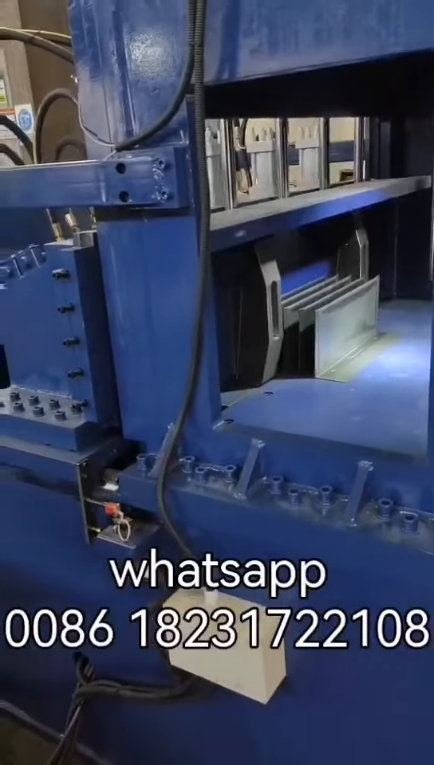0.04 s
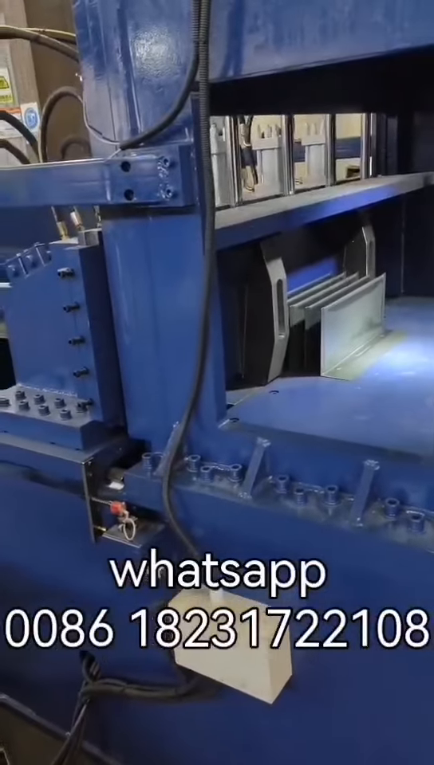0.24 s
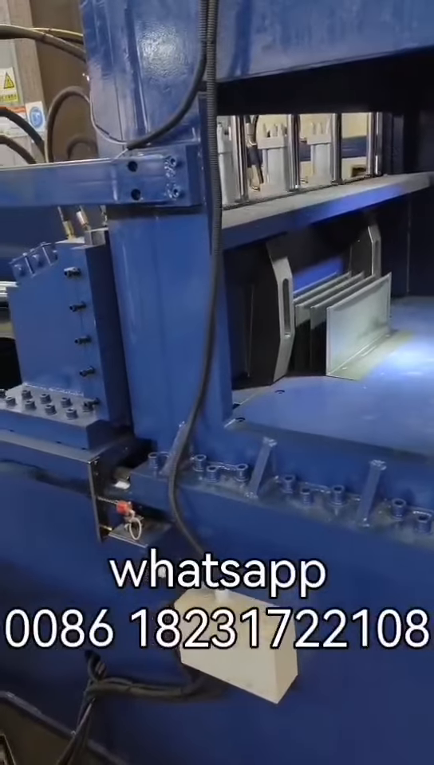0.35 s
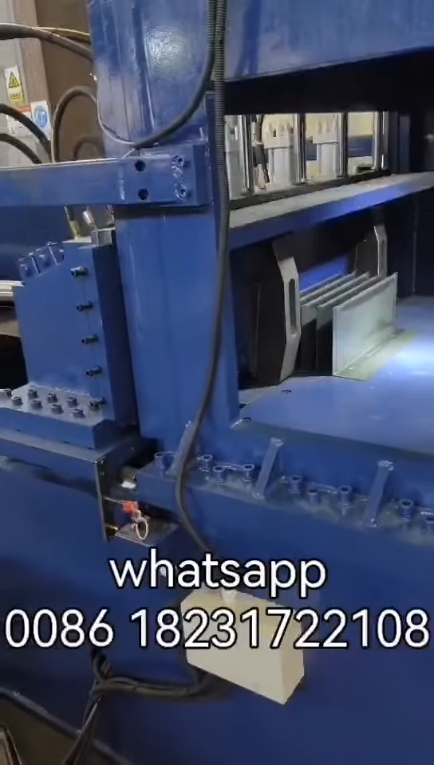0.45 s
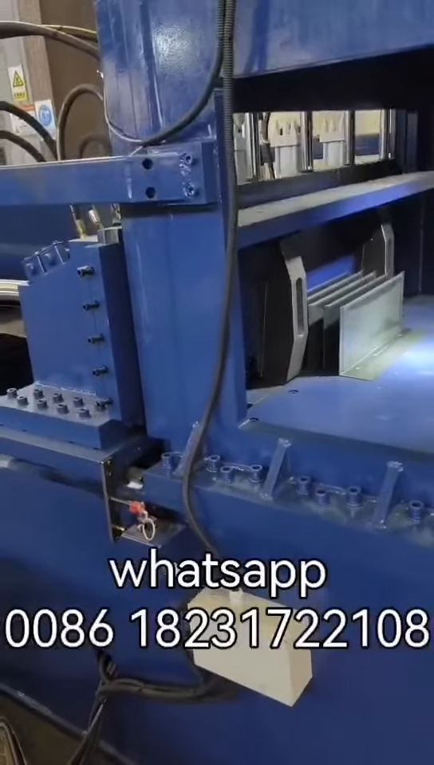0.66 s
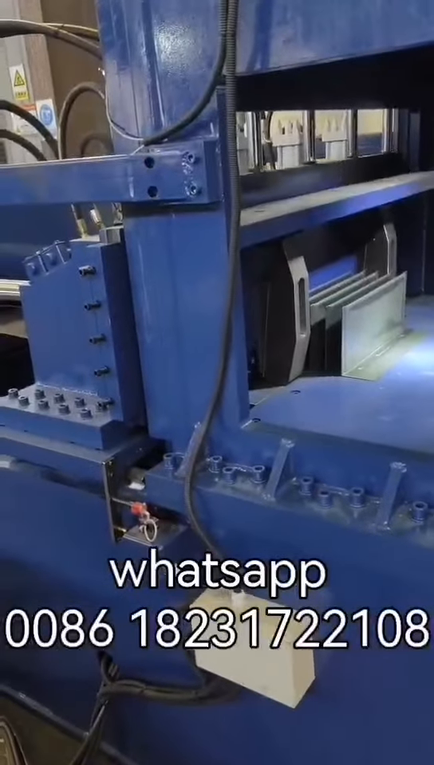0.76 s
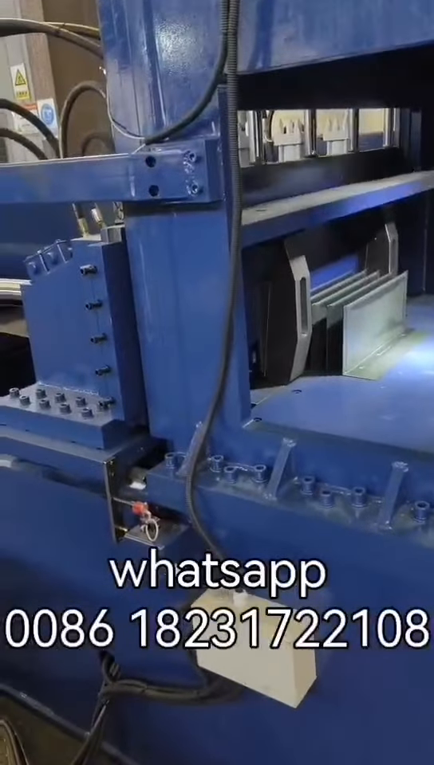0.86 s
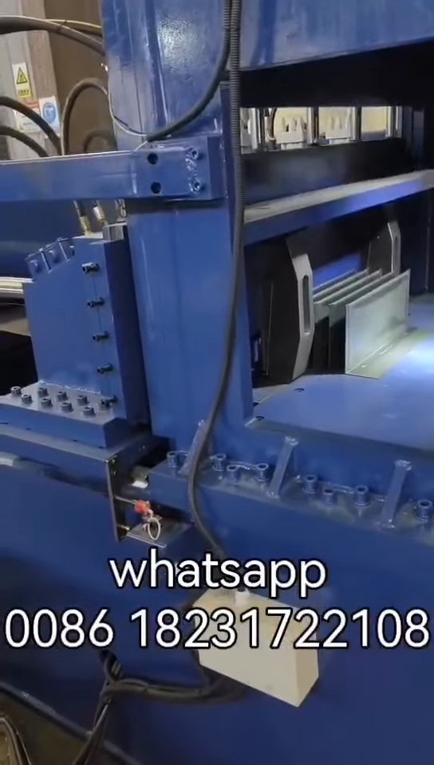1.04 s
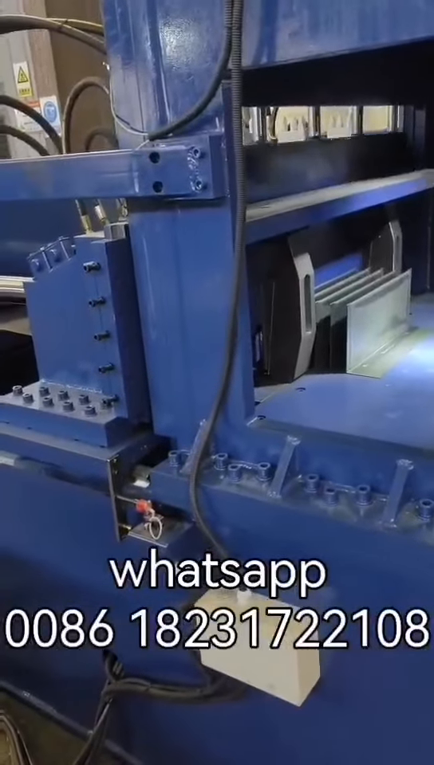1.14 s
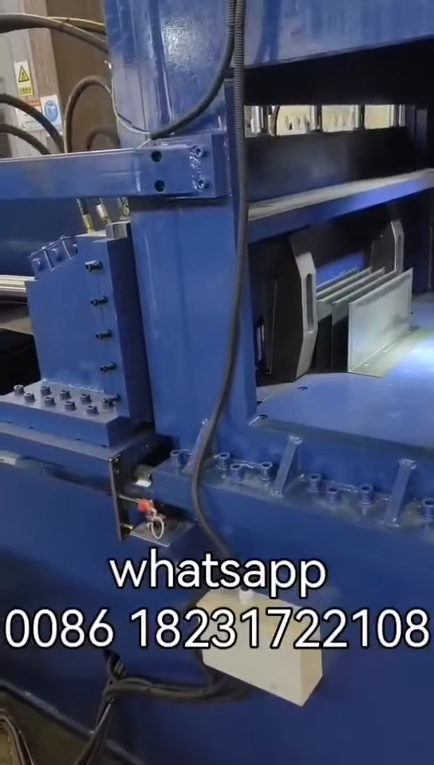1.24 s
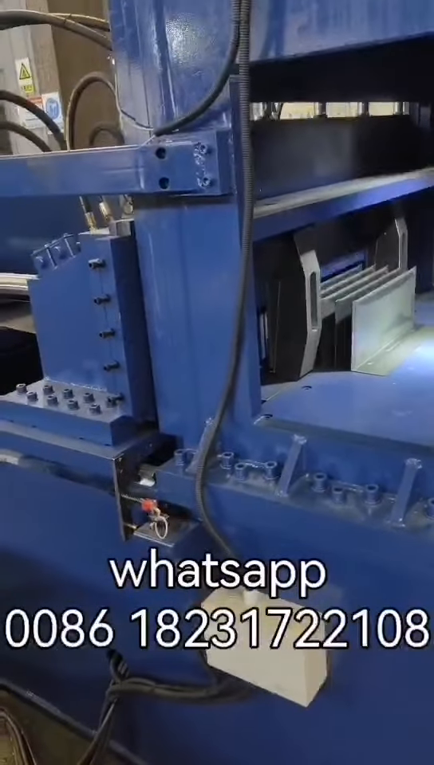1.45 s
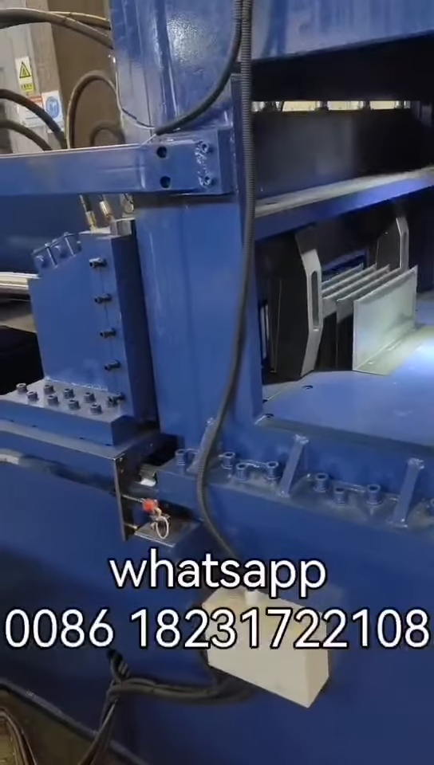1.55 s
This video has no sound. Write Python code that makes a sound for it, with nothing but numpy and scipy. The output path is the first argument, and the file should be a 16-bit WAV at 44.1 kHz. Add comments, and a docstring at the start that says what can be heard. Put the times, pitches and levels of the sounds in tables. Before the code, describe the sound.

A hydraulic metal forming machine surges with low knocks, then runs with a steady hiss and hum.

```python
"""A hydraulic metal forming machine starts its stroke, heard at one microphone in a factory hall.
At first the pump idles in the background. At 0.2 s a valve ticks open, the surge of oil knocks the
pipes and the steel frame in the foreground, and the hall booms. Oil spits and hisses through the
valve and the ram begins to hum. From 0.7 s the knocks die away, and the hiss, a thin whistle and
the hum of the moving ram carry on to the end."""
import sys
import numpy as np
from scipy import signal
from scipy.fft import rfft, irfft
from scipy.io import wavfile

SR = 44100
rng = np.random.default_rng(int(sys.argv[2]) if len(sys.argv) > 2 else 0)


def transcribe(u):
    """Save the signal u as a 16-bit wav file named by the first command-line argument.

    u: samples, shape (n,) or (channels, n), limited to [-1, 1]; the rate is SR.
    q: integer samples, one column per channel.
    """
    v = np.clip(np.atleast_2d(u).T, -1, 1)
    q = np.round(v * 32767).astype(np.int16)
    wavfile.write(sys.argv[1], SR, q)


N = 70560
TIME_S = np.arange(N) / SR
BINS_HZ = np.fft.rfftfreq(N, 1 / SR) + 1  # kept above zero for the logarithm


def amp(db):
    """Decibels as a gain."""
    return 10 ** (np.asarray(db) / 20)


def unit(x):
    """Scales to an rms of one."""
    return x / np.sqrt(np.mean(x ** 2) + 1e-20)


def level(points):
    """Gain over time from rows of time_s, level_db."""
    return amp(np.interp(TIME_S, *np.transpose(points)))


def fade_in(start_s, length_s):
    """A ramp from zero to one."""
    return np.clip((TIME_S - start_s) / length_s, 0, 1)


def colour(x, points):
    """Filters by rows of pitch_hz, gain_db."""
    hz, db = np.transpose(points)
    return irfft(rfft(x) * amp(np.interp(np.log(BINS_HZ), np.log(hz), db)), N)


def noise(spectrum):
    """Noise of rms one, shaped by rows of pitch_hz, density_db."""
    return unit(colour(rng.standard_normal(N), spectrum))


def drift(rate_hz):
    """Random wander of rms one, mostly slower than rate_hz."""
    return unit(irfft(rfft(rng.standard_normal(N)) / (1 + (BINS_HZ / rate_hz) ** 4), N))


def resonance(hz, width_hz):
    """Turbulence ringing in one narrow band, at an rms of one."""
    return unit(irfft(rfft(rng.standard_normal(N)) / (1 + (2 * (BINS_HZ - hz) / width_hz) ** 2), N))


def wavering_tone(hz, waver_hz, rate_hz):
    """A sine whose pitch wanders by waver_hz rms."""
    return np.sin(2 * np.pi * np.cumsum(hz + waver_hz * drift(rate_hz)) / SR)


# modes of the steel frame and pipes: pitch_hz, level_db, t60_s
FRAME_MODES = [(71.1, -16.5, 0.44), (105.6, -19, 0.23), (117.2, 1, 0.345), (149.3, -8.5, 0.48),
               (178.6, -9, 0.16), (227.3, -4, 0.37), (256.2, -1.5, 0.22), (277.5, 2.3, 0.28),
               (405.6, -4.5, 0.23), (471, -15, 0.18), (529.5, -3.7, 0.37), (660, -12.5, 0.55),
               (712.0, -11.5, 0.64), (827, -18, 0.5)]
# dull boom of a knock out in the hall: pitch_hz, density_db
BOOM_SPECTRUM = [(30, -36), (55, -37), (75, -12), (110, 1), (280, -4.5), (450, -8.5), (680, -7.5),
                 (1000, -22.5), (1600, -53), (4000, -73)]
def knock(start_s, boom_db, ring_db, stress_hz):
    """One pressure blow rings the frame and booms through the hall, stressed around one pitch."""
    def stress(hz, lift_db=8.5, width_octaves=0.39):
        return amp(lift_db * np.exp(-(np.log2(hz / stress_hz) / width_octaves) ** 2))

    age = np.maximum(TIME_S - start_s, 0)
    ring = sum(stress(hz) * amp(db - 60 * age / t60) * np.sin(2 * np.pi * hz * age)
               for hz, db, t60 in FRAME_MODES)
    boom = irfft(rfft(noise(BOOM_SPECTRUM)) * stress(BINS_HZ), N)
    boom_t60_s, tail_t60_s = 0.21, 0.71
    decay = np.hypot(amp(-60 * age / boom_t60_s), amp(-16.5 - 60 * age / tail_t60_s))
    attack = fade_in(start_s, length_s=0.0053)
    return attack * (amp(ring_db - 28) * ring + amp(boom_db - 23.5) * decay * boom)


# knocks of the oil surge, in the foreground: start_s, boom_db, ring_db, stress_hz
SURGE_KNOCKS = [(0.2327, -3, 0.4, 109), (0.252, -0.5, -3, 293), (0.2823, 2, 2.5, 157),
                (0.2941, -4.5, -2.5, 546), (0.3215, -2.2, -7, 285), (0.337, -1.2, -6.7, 690),
                (0.354, -1, -4.5, 210), (0.4025, -7.5, -6, 133), (0.4358, -6.6, -13, 400),
                (0.4519, -13.0, -8, 155), (0.4948, -12, -18, 126), (0.572, -16, -14.5, 566),
                (0.6147, -16.5, -13.9, 315), (0.6561, -18, -15, 167), (0.6812, -12, -18, 886)]
# low shudder of the frame: time_s, level_db
SHUDDER_LEVEL = [(0, -83), (.25, -58), (.4, -30.5), (.5, -35), (.56, -45), (.63, -38.5), (.72, -43),
                 (.77, -46), (.98, -49), (1.22, -49.5), (1.31, -57.5), (1.6, -61)]
# its bass-heavy colour: pitch_hz, density_db
SHUDDER_SPECTRUM = [(30, -27), (58, -17.5), (90, 1.5), (130, 1), (190, -2), (400, -25), (1500, -52)]
def surge():
    """The oil surge knocks the machine and leaves a shudder in its frame."""
    knocks = sum(knock(*row) for row in SURGE_KNOCKS)
    return knocks + level(SHUDDER_LEVEL) * noise(SHUDDER_SPECTRUM)


# oil rushing through the valve: time_s, level_db
FLOW_LEVEL = [(0, -91), (.2, -63), (.225, -51), (.272, -46.5), (.298, -38), (.33, -35), (.38, -41),
              (.45, -39.5), (.58, -41.5), (.62, -39.5), (.8, -44), (1.15, -44.5), (1.28, -43),
              (1.37, -45.5), (1.6, -45)]
# its hiss and crackle: pitch_hz, density_db
HISS_SPECTRUM = [(300, -20), (1000, 1), (1480, 1.5), (1750, 4.5), (2100, 3), (2450, 4.5), (3100, 2),
                 (4000, 1), (5300, -0.15), (7200, 1), (9700, -3), (10700, -0.6), (12200, -9), (13000, -14),
                 (14000, -21)]
# pipes ringing in the flow: pitch_hz, width_hz, level_db
PIPE_RESONANCES = [(1763, 29, -16.5), (2155, 46, -16.5), (2380, 43, -19), (2480, 51, -17.5)]
def oil_flow(pops_per_s=1800, fizz_from_hz=9300):
    """Oil hisses with fine cavitation crackle, fluttering most at the top, and rings the pipes."""
    pops = rng.standard_normal(N) * amp(np.minimum(rng.exponential(1, N), 4))
    pops *= rng.random(N) < pops_per_s / SR
    crackle = amp(-8.5) * unit(colour(pops, HISS_SPECTRUM))
    hiss = unit(noise(HISS_SPECTRUM) + crackle)
    fizz = irfft(rfft(hiss) * (BINS_HZ > fizz_from_hz), N)
    hiss = hiss - fizz + fizz * amp(1.5 * drift(rate_hz=15.5))
    hiss *= amp(0.72 * drift(rate_hz=37))
    pipes = sum(amp(db) * resonance(hz, width_hz) for hz, width_hz, db in PIPE_RESONANCES)
    return level(FLOW_LEVEL) * (hiss + pipes)


# spits at the valve: start_s, level_db, t60_s
VALVE_SPITS = [(.218, -41.5, 0.057), (0.29, -35.5, .17), (.425, -38.5, 0.13), (.608, -40, 0.13),
               (1.272, -44, .14)]
# their bright colour: pitch_hz, density_db
SPIT_SPECTRUM = [(2000, -15), (5500, -27), (7500, 9), (9700, 4.5), (11500, 4.5), (12600, -11), (14000, -27)]
def spits(rise_s=0.0016):
    """Short bright spurts of oil as the valve opens and the flow catches."""
    spurts = np.zeros(N)
    for start_s, db, t60 in VALVE_SPITS:
        age = np.maximum(TIME_S - start_s, 0)
        spurts += fade_in(start_s, rise_s) * amp(db - 60 * age / t60) * noise(SPIT_SPECTRUM)
    return spurts


# bright 8-9 kHz hiss during the surge: time_s, level_db
BRIGHT_HISS_LEVEL = [(0, -94.5), (.28, -80), (.31, -34), (.38, -38), (.68, -42), (.76, -72), (1.6, -73)]
# its treble colour: pitch_hz, density_db
BRIGHT_HISS_SPECTRUM = [(6000, -39), (7400, -10), (8100, 3), (8900, 8), (9500, -15), (12000, -24),
                        (13200, -21), (14000, -29)]
# fuzzy ring of the valve: time_s, level_db
VALVE_RING_LEVEL = [(0, -92), (.27, -70), (.31, -49), (.54, -52.5), (.62, -53), (.8, -69), (1.6, -70)]
# thin whistle of the valve: time_s, level_db
WHISTLE_LEVEL = [(0, -93), (.55, -68), (.62, -56), (.77, -52), (.85, -56.5), (1.03, -52), (1.22, -57),
                 (1.28, -51), (1.35, -58), (1.43, -52), (1.6, -53)]
def valve():
    """A bright hiss and a fuzzy ring in the surge give way to a thin, flickering whistle."""
    whistle = unit(amp(1.3 * drift(rate_hz=20)) * resonance(hz=6940, width_hz=220))
    bright_hiss = level(BRIGHT_HISS_LEVEL) * noise(BRIGHT_HISS_SPECTRUM)
    ring = level(VALVE_RING_LEVEL) * resonance(hz=4740, width_hz=200)
    return bright_hiss + ring + level(WHISTLE_LEVEL) * whistle


# tones of the ram's hum: pitch_hz, level_db
HUM_TONES = [(296.5, -40.5), (668, -52), (703, -59), (530, -56)]
# swells and dips of that hum: time_s, gain_db
HUM_GAIN = [(0, -67), (.3, -29), (.41, 6.5), (.48, 11), (.56, -5), (.63, 7), (.685, -14), (.74, 1),
            (.82, -2), (.91, 3), (1.0, -4.5), (1.06, -1.5), (1.25, 0), (1.33, 1), (1.4, -3), (1.49, -2.5),
            (1.6, -9)]
# rumble of the sliding ram: pitch_hz, density_db
RUMBLE_SPECTRUM = [(30, -33), (60, -19), (110, -5.5), (200, -5.5), (290, -4), (380, 0), (450, -7.5),
                   (700, -3.5), (1150, -5.5), (1450, -20.5), (3000, -29.5)]
# that rumble over the stroke: time_s, gain_db
RUMBLE_GAIN = [(0, -53), (.25, -49), (.33, 12), (.48, 5), (.56, 6), (.72, 2), (.8, -0.5), (1.0, -0.5),
               (1.2, 1), (1.33, 1), (1.42, -2), (1.6, -2.5)]
def ram():
    """The moving ram gives a wavering, flickering hum over the rumble of sliding steel."""
    hum = sum(amp(db + drift(rate_hz=38)) * wavering_tone(hz, waver_hz=0.7, rate_hz=12)
              for hz, db in HUM_TONES)
    rumble = amp(-43.5) * noise(RUMBLE_SPECTRUM)
    return level(HUM_GAIN) * hum + level(RUMBLE_GAIN) * rumble


# tones of the idling pump: pitch_hz, level_db
PUMP_TONES = [(194, -53), (597, -48.5), (856, -55), (1744, -60)]
# room tone of pump and hall, behind the machine: pitch_hz, density_db
HALL_SPECTRUM = [(25, -17), (55, -24), (90, -10), (130, -2.5), (230, 0.5), (430, -7.5), (620, -6.5),
                 (1000, -12.5), (1500, -18), (2300, -20.5), (4500, -33), (7200, -30), (11500, -43.5),
                 (12800, -58)]
# the whole background over time: time_s, gain_db
HALL_GAIN = [(0, 0.5), (.3, 1), (.8, -8), (1.6, -9)]
def pump_and_hall():
    """The idling pump fills the hall; as the stroke gets under way its drone eases and its tones go."""
    tones = sum(amp(db) * wavering_tone(hz, waver_hz=2.2, rate_hz=7.7) for hz, db in PUMP_TONES)
    tones *= 1 - fade_in(start_s=0.28, length_s=0.3)
    drone = amp(-36.5) * noise(HALL_SPECTRUM)
    return level(HALL_GAIN) * (drone + tones)


def scene():
    """Machine in front, hall behind, all arriving at the one microphone."""
    return (surge() + spits() + oil_flow() + valve() + ram() + pump_and_hall())[None]


# deep treble notch from 7.7 to 9.3 kHz over the whole sound: pitch_hz, gain_db
TREBLE_NOTCH = [(7300, 0.5), (7700, -10.5), (8050, -26.5), (8950, -19.5), (9300, -9.5), (9650, -0.5)]
def record(dry, low_cut_hz=45, high_cut_hz=14000):
    """A deep notch hollows the treble, then the deep bass and the very top are cut."""
    low_cut = signal.butter(2, low_cut_hz, "high", fs=SR, output="sos")
    high_cut = signal.firwin(511, high_cut_hz, window=("kaiser", 9), fs=SR)
    notched = colour(dry[0], TREBLE_NOTCH)
    return signal.oaconvolve(signal.sosfilt(low_cut, notched), high_cut, "same")[None]


dry = scene()
out = record(dry)
transcribe(out)
```